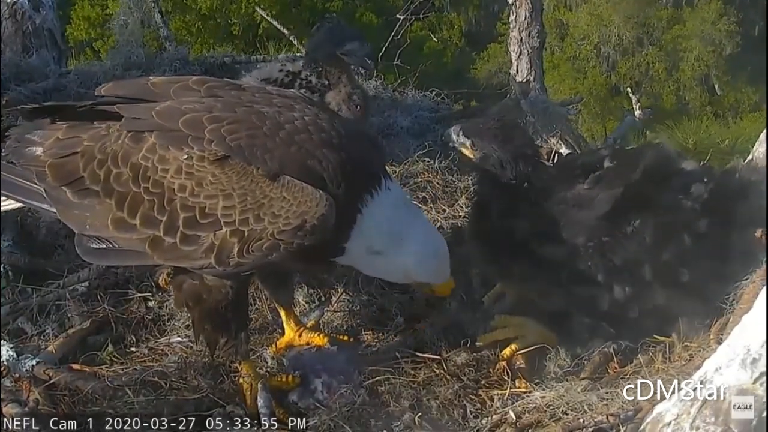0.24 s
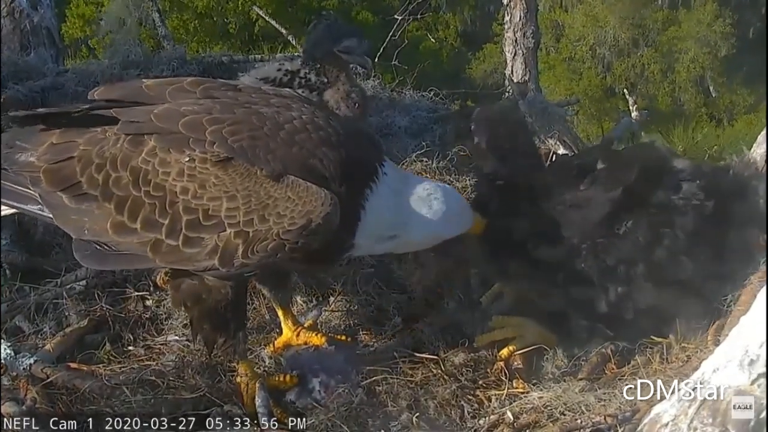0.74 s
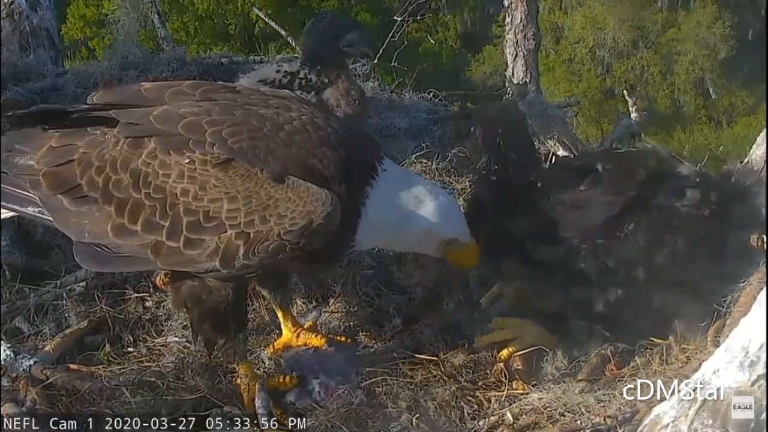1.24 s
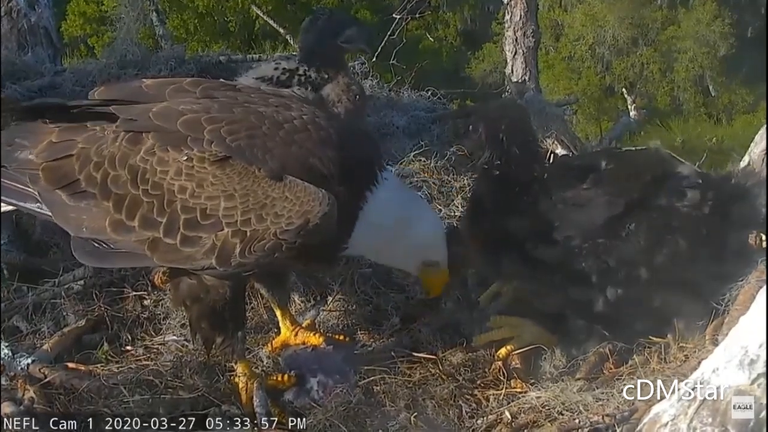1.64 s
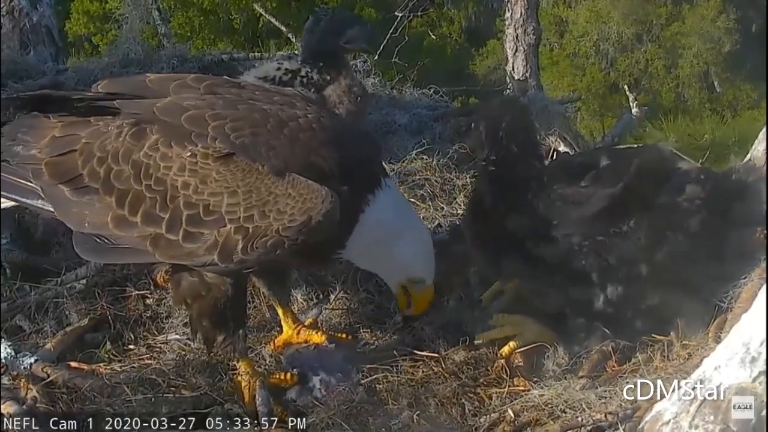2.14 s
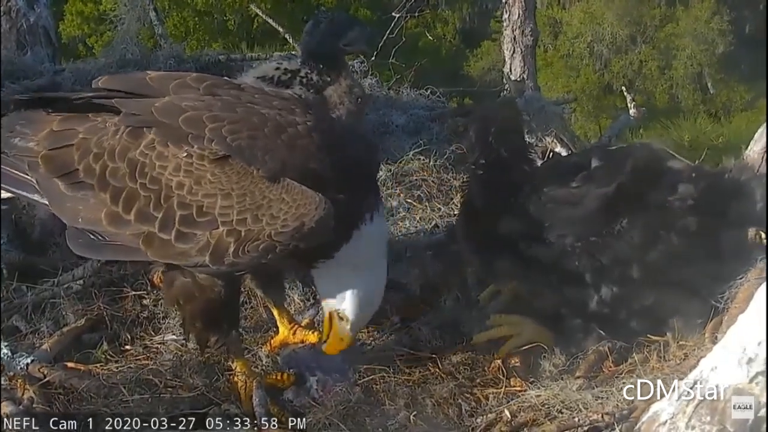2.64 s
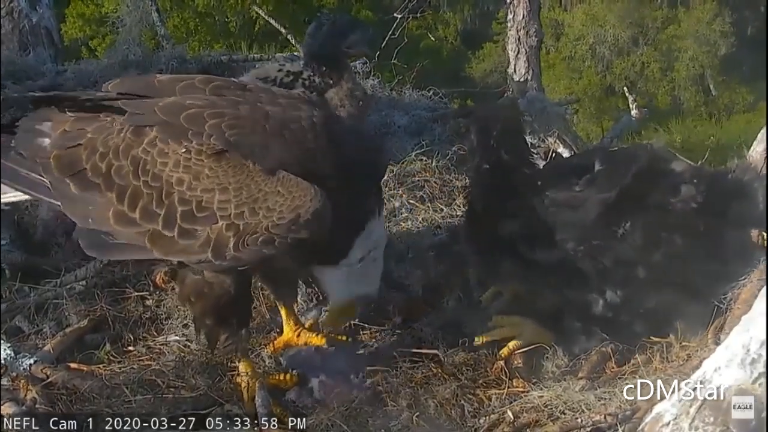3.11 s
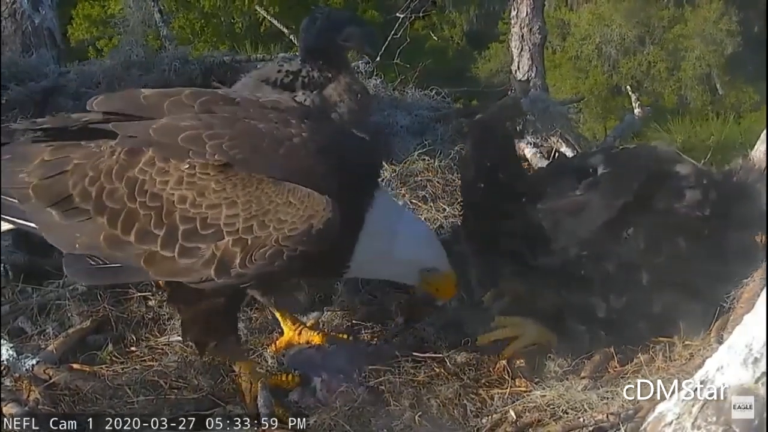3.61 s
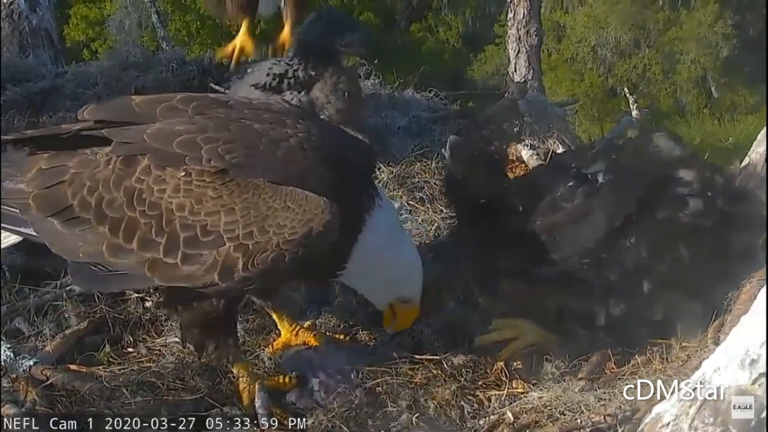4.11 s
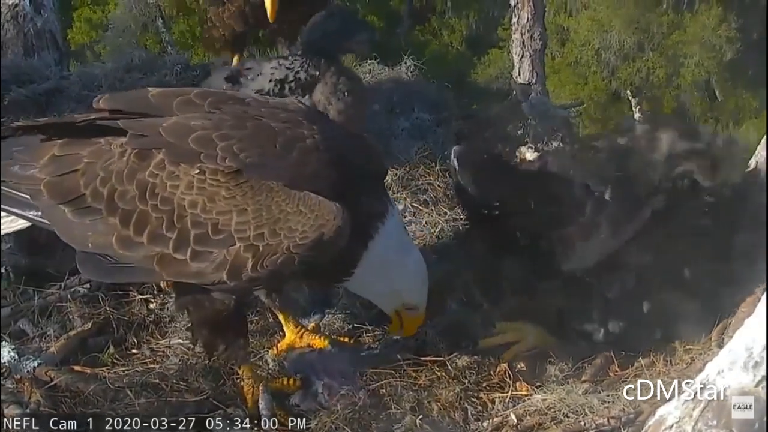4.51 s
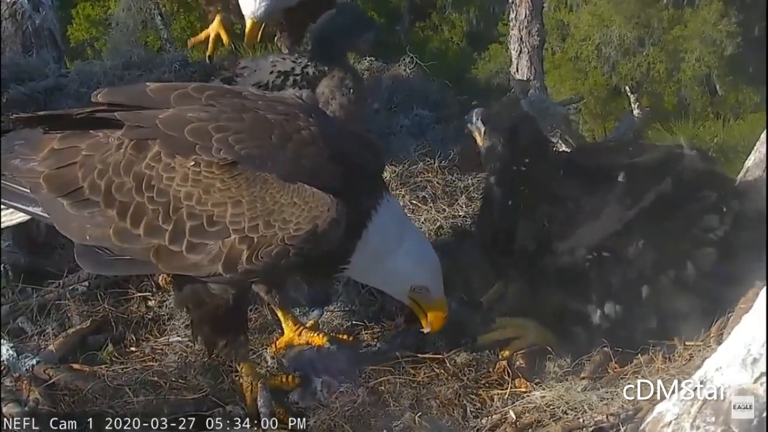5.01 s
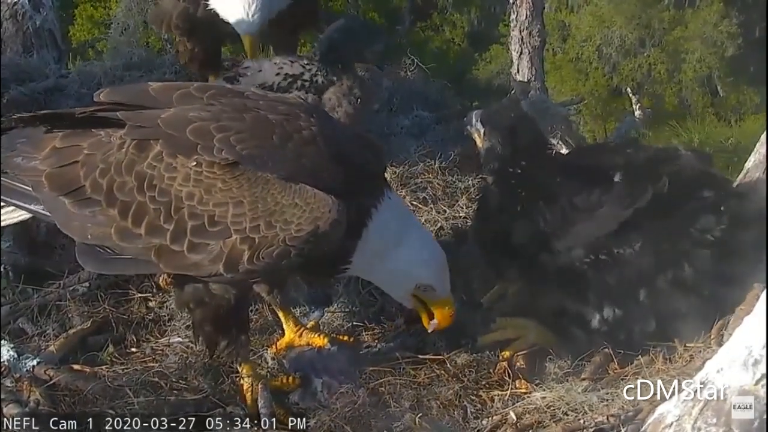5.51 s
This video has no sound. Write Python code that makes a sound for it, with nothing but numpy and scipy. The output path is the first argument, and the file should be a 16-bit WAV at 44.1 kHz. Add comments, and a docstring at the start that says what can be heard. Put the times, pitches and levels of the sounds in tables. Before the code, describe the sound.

Eagles give thin, raspy, wavering high whistles that crack into short yelps, with a warbling scream and chirps over outdoor hiss.

```python
"""At a treetop nest, eagles call close to a small outdoor microphone that overloads on the loudest notes.
Thin, raspy whistles leap, waver and end in a yelp as the voice breaks to a low register; between them come
a warbling scream and a few chirps, and a fainter bird pipes above. The calls are near sines roughened by
a rattle, a buzz and uneven airflow. Trunks and foliage echo them, over noise shaped into a steady hiss,
a low rumble that swells and dips, and soft rustles."""
import sys
import numpy as np
from scipy import signal
from scipy.fft import rfft, irfft
from scipy.io import wavfile
from scipy.ndimage import uniform_filter1d

SR = 44100
rng = np.random.default_rng(int(sys.argv[2]) if len(sys.argv) > 2 else 0)


def pcm_store(signal):
    """Save signal as 16-bit PCM."""
    levels = np.round(np.clip(np.atleast_2d(signal), -1, 1) * 32767)
    wavfile.write(sys.argv[1], SR, levels.astype(np.int16).T)


N = 253553
TIME = np.arange(N) / SR  # seconds

# Long whistles, one list per call; the voice rings clear on the surges and turns hoarse between.
# Each row: time in seconds, pitch in Hz, level in dB before the trim in whistles(), rasp from 0 to 1.
WHISTLE_CALLS = [
    [(0.0, 3150, -16, 0.37), (.022, 3207, -30, 0.4), (.036, 3218, -18.5, 0.17), (.07, 3272, -29.5, 0.67),
     (.082, 3256, -16, 0.36), (.096, 3234, -24, 0.5), (.125, 3270, -19, .15), (.155, 3235, -23.5, 0.53),
     (.18, 3260, -19.5, 0.12), (.198, 3240, -26, 0.76), (.218, 3296, -16.5, 0.25), (.238, 3268, -19, 0.46),
     (.252, 3223, -24.5, 0.68), (.277, 3155, -16, 0.27), (.293, 2790, -19.5, .55)],
    [(.712, 2536, -38.5, 0.38), (.728, 3130, -31, 0.5), (.745, 3430, -28, .65), (.765, 3500, -29, 0.25),
     (.787, 3413, -31.5, 0.48), (.812, 3132, -25.5, 0.18), (.835, 3020, -33, 0.8),
     (.855, 2951, -25.5, 0.35), (.915, 2986, -31, .45), (.952, 3080, -34, .55), (.974, 3097, -22.5, 0.25),
     (.992, 3220, -28.5, 0.61), (1.016, 3280, -18.5, .3), (1.036, 3297, -29, 0.74),
     (1.075, 3350, -29.5, 0.7), (1.15, 3353, -31.5, 0.84), (1.215, 3383, -28, 0.45),
     (1.248, 3443, -22, 0.35), (1.285, 3442, -25, .3), (1.305, 3366, -31.5, .58),
     (1.355, 3435, -22.5, 0.35), (1.395, 3448, -22, .36), (1.415, 3447, -22, 0.43), (1.424, 3451, -23, .35),
     (1.44, 3441, -21.5, 0.3), (1.464, 3428, -29.5, 0.92), (1.491, 3409, -16.5, 0.33)],
    [(2.98, 3530, -40, 0.67), (2.994, 3580, -34.5, 0.68), (3.011, 3540, -40.5, .8),
     (3.023, 3285, -31.5, 0.78), (3.04, 3010, -39, .55), (3.073, 2800, -35.5, 0.37), (3.1, 2847, -52, .6),
     (3.127, 2950, -36, 0.27), (3.143, 2960, -39, .6), (3.165, 3014, -31.5, .15), (3.205, 2940, -41, 0.53),
     (3.222, 2945, -34.5, 0.15), (3.25, 2985, -39, 0.82), (3.287, 2990, -34, 0.81),
     (3.325, 2880, -41, 0.65), (3.333, 2934, -32.5, .2), (3.35, 2980, -34.5, 0.25),
     (3.372, 2958, -30, 0.06), (3.415, 2935, -37.5, .42), (3.44, 2810, -28.5, 0.34),
     (3.452, 2880, -50, 0.6), (3.492, 2880, -29, 0.31), (3.535, 2947, -35.5, 0.36), (3.595, 2832, -38, .5),
     (3.62, 2900, -34, 0.4), (3.645, 2880, -37, 0.56), (3.678, 2890, -33.5, 0.35), (3.72, 2845, -41.5, .58),
     (3.785, 2840, -37.5, 0.83), (3.802, 2850, -37, .35), (3.828, 2794, -31.5, 0.62),
     (3.843, 2820, -57, 0.64), (3.853, 2743, -27, 0.07), (3.872, 2622, -27, 0.2), (3.884, 2538, -45, .4),
     (3.897, 2520, -35, 0.5)],
    [(4.875, 2558, -38.5, 0.41), (4.905, 2768, -37, 0.43), (4.94, 2900, -33, .35), (4.99, 2790, -37, .5),
     (5.068, 2798, -34.5, 0.48), (5.1, 2916, -32, 0.15), (5.176, 2899, -31.5, .2),
     (5.195, 2968, -46.5, 0.68), (5.25, 2975, -38, .7), (5.262, 2894, -30.5, 0.13),
     (5.288, 2899, -29.5, .15), (5.308, 2940, -40, .59), (5.35, 3045, -34.5, 0.27),
     (5.361, 3040, -40, 0.33), (5.372, 3030, -43, 0.5), (5.379, 3020, -30, 0.1), (5.388, 2945, -27, .73),
     (5.395, 2844, -31, 0.69), (5.404, 2715, -46, 0.52), (5.416, 2680, -39, .4)],
]
# One loud, warbling scream that breaks in and out of hoarseness.
# Each row: time in seconds, pitch in Hz, level in dB, rasp from 0 to 1.
SCREAM_CONTOUR = [(1.745, 3350, -40, 0.44), (1.761, 3650, -27.5, 0.6), (1.783, 3650, -24, 0.09),
                  (1.803, 3400, -28.5, 0.85), (1.826, 3150, -23.5, 0.34), (1.851, 3250, -32.5, 0.72),
                  (1.87, 3430, -15.5, 0.38), (1.882, 3535, -29, 0.7), (1.905, 3530, -21.5, 0.19),
                  (1.93, 3494, -24, 0.82), (1.954, 3346, -29, 0.86), (1.978, 3284, -20.5, 0.32),
                  (2.015, 3240, -26.5, 0.53), (2.028, 3393, -17.5, 0.45), (2.043, 3516, -26.5, 0.6),
                  (2.057, 3440, -18.5, 0.54), (2.07, 3270, -23.5, 0.66), (2.086, 3120, -28, 0.6),
                  (2.1, 3170, -17, 0.07), (2.122, 3230, -27, .55), (2.138, 3350, -27.5, 0.54),
                  (2.151, 3370, -24.5, 0.92), (2.165, 3408, -25, 0.4), (2.18, 3290, -23.5, 0.6),
                  (2.225, 3286, -19.5, 0.19), (2.246, 3200, -29, 0.53), (2.269, 3140, -21, 0.27),
                  (2.289, 3120, -22, 0.41), (2.315, 3260, -27.5, 0.48), (2.338, 3350, -24.5, 0.63),
                  (2.37, 3330, -26, 0.63), (2.388, 3380, -22, 0.49), (2.412, 3220, -29.5, .75),
                  (2.431, 3240, -25.5, 0.46), (2.511, 3425, -31, 0.85), (2.53, 3510, -24.5, 0.31),
                  (2.544, 3410, -35, 0.56), (2.567, 3180, -27, 0.77), (2.591, 2552, -34.5, 0.58)]
# Short arched chirps. Each row: time of the top in seconds, half length in seconds, top pitch in Hz,
# full fall in Hz, top level in dB, full fade in dB; the ends reach about 82 % of the fall and the fade.
CHIRP_NOTES = [(4.142, 0.047, 3200, 400.3, -31.5, -10), (4.302, 0.06, 3040, 515.3, -32, -14.5),
               (4.451, .054, 2893, 398.7, -37, -3), (4.57, .045, 2815, 40.1, -41.5, -4.5),
               (4.797, 0.048, 2975, 329.3, -36.5, -1.5)]
# Rasp of a chirp, from 0 to 1: at its crest, then at the full fall.
CHIRP_RASP_RANGE = .35, .7
# The voice breaks. Each row: start in seconds, length in seconds, start and end pitch in Hz, level in dB,
# fundamental and third harmonic in dB against the second harmonic.
YELP_NOTES = [(0.302, 0.012, 2060, 1956, -33.5, 4, -31.5), (.31, 0.016, 1314, 1237, -15.5, -24, -16.5),
              (0.328, 0.0082, 1247, 1204, -17, -29, -13), (1.491, 0.0048, 1570, 1305, -16.5, -45, -23.5),
              (1.505, 0.025, 2013, 1812, -28, -4.5, -22.5), (1.52, .024, 1190, 1131, -32.5, -14, 7.5),
              (3.908, 0.0088, 1144, 1126, -34.5, -16.5, -3), (5.415, .016, 1320, 1248, -28.5, -32, -24),
              (5.429, 0.018, 1194, 1168, -32.5, -31, -7)]
# Sharp cracks as two whistles break off. Each row: start in seconds, decay time in seconds, level in dB.
CRACK_BURSTS = [(0.309, 0.012, -47.5), (1.492, .005, -43.5)]
# How the membrane shakes as the calls go on.
# Each row: time in seconds, rattles per second, rattle depth and buzz depth as ratios.
MEMBRANE_SHAKING = [(.1, 206, 0.64, 0.43), (.29, 210, 0.28, 0.62), (.72, 123, 1, 0.15),
                    (.85, 160, 0.76, 0.2), (1.03, 190, 0.58, .25), (1.2, 335, 0.75, 0.26),
                    (1.48, 334, 0.86, .35), (1.78, 210, .7, 0.57), (2.0, 234, 0.59, 0.47),
                    (2.2, 278, 0.53, 0.74), (2.37, 338, 0.57, 0.69), (2.579, 250, 0.55, 0.55),
                    (2.99, 230, 0.9, 0.22), (3.28, 150, .95, .25), (3.45, 225, 0.64, .35),
                    (4.3, 177, .75, 0.25), (5.4, 210, 0.79, 0.27)]
# Overtones of the voice. Each row: multiple of the pitch, level in dB against the note.
VOICE_OVERTONES = [(2, -43), (3, -53), (4, -61.5)]
# The fainter bird's arched notes. Each row: time of the top in seconds, half length in seconds,
# top pitch in Hz, fall to either end in Hz, top level in dB before the trim in piping(),
# change of level at the ends in dB.
PIPED_NOTES = [(2.66, 0.036, 3830, 90.4, -37.5, -1), (2.74, 0.047, 3870, 90.16, -44, -5),
               (2.83, .04, 3800, 70.65, -47.5, -6), (3.385, 0.054, 3945, 147.8, -45, 5.5),
               (3.53, 0.077, 3887, 100.7, -45.5, 2), (3.675, 0.072, 3945, 132.9, -46.5, -6),
               (4.312, 0.0403, 4027, 98.8, -46, -7), (4.46, 0.037, 4020, 60.9, -47.5, -3),
               (4.565, .05, 3950, 30.03, -51.5, 6), (5.618, 0.052, 4124, 108.7, -43.5, -22)]
# Echoes off nearby limbs and trunks. Each row: delay in seconds, level in dB.
TRUNK_ECHOES = [(.0062, -15), (.0123, -12), (.0195, -15), (.034, -17), (.057, -21)]
# Short rustles, and two broad, faint swells of low noise under the loud calls.
# Each row: centre in seconds, spread in seconds, level in dB.
RUSTLE_SWELLS = [(0.274, 0.083, -49.5), (0.997, 0.5, -56), (2.106, 0.43, -58.5), (3.5, 0.062, -52.5),
                 (4.82, 0.012, -52.5), (4.955, 0.025, -51), (5.013, 0.05, -59), (5.035, 0.015, -51),
                 (5.056, 0.0082, -48.5)]
# Swells and dips of the low rumble, several of them under the loudest calls.
# Each row: centre in seconds, spread in seconds, change of level in dB.
RUMBLE_SWELLS = [(0.277, 0.059, 10.5), (1.04, 0.068, 2.5), (1.355, 0.048, 9), (1.676, 0.088, -10.5),
                 (1.863, 0.062, 11), (2.023, 0.078, 7), (2.66, 0.044, -19.5), (2.858, 0.094, -12),
                 (3.485, 0.071, 11), (3.687, 0.04, -4), (4.811, 0.019, 7), (5.027, 0.045, 17),
                 (5.42, 0.061, 8)]
# Noise spectra. Each row: frequency in Hz, relative density in dB per Hz.
OVERLOAD_SPECTRUM = [(4000, -27.5), (6000, -1), (8000, 3), (10000, -2.5), (11500, -8.5), (13500, -0.5)]
CRACK_SPECTRUM = [(500, -8.5), (1500, -5), (4000, 2.5), (6000, -5), (8000, 5.5), (10000, -15.5),
                  (14000, -8.5)]
RUSTLE_SPECTRUM = [(40, -8), (130, -12.5), (300, -1), (700, -1.5), (1300, -1), (3000, -6), (8000, -52.5)]
RUMBLE_SPECTRUM = [(20, -7.5), (45, 0.5), (78, -0.5), (120, -5), (200, -13), (400, -24), (1000, -31),
                   (3000, -72.5)]
HISS_SPECTRUM = [(180, -68), (300, -41.5), (325, -26), (382, -25.5), (589, -19.5), (881, -18.5),
                 (1180, -12.5), (1680, -14.5), (2630, 1.5), (3690, -3.5), (3990, -6), (5690, -26.5),
                 (14000, -49.5)]


def whistles(trim_db=-1.5):
    """Long held calls that leap up, sag, waver and drop."""
    s, _, _, rasp = np.vstack(WHISTLE_CALLS).T
    notes = [np.array(rows)[:, :3] for rows in WHISTLE_CALLS]
    return undb(trim_db) * voice(notes, np.interp(TIME, s, rasp))


def scream():
    """A loud call swings up and down in pitch, clear on its surges and harsh between, then sinks away."""
    s, hz, db, rasp = np.transpose(SCREAM_CONTOUR)
    return voice([np.column_stack([s, hz, db])], np.interp(TIME, s, rasp))


def chirps(bell=1.7):
    """A few short notes between the last two whistles: clear at the crest, hoarse as they rise and trail off."""
    u = np.linspace(-1, 1, num=21)
    flank = 1 - np.exp(-bell * u ** 2)  # 0 at the crest
    notes = []
    for s, half, hz, fall, db, fade in CHIRP_NOTES:
        notes.append(np.column_stack([s + half * u, hz - fall * flank, db + fade * flank]))
    rasp = np.tile(np.interp(flank, [0, 1], CHIRP_RASP_RANGE), len(notes))
    return voice(notes, np.interp(TIME, np.vstack(notes)[:, 0], rasp))


def voice(notes, rasp, tremble_db=2.06, surge_db=-20, crackle_db=-59):
    """Trembling syrinx notes; the strongest surges crackle with treble noise as the microphone overloads."""
    hz, loud = phrase(notes, edge_s=.004)
    tone = syrinx(hz, rasp) * loud * undb(tremble_db * flutter(64))
    power = uniform_filter1d(tone ** 2, size=40)
    surge = np.tanh((power / undb(surge_db) ** 2) ** 2)
    return tone + undb(crackle_db) * surge * coloured(OVERLOAD_SPECTRUM)


def syrinx(hz, rasp, buzz_hz=463.6):
    """A near sine; with rasp the clear tone gives way to side bands from uneven airflow, a rattle and a buzz."""
    rasp = np.clip(rasp, 0, .95)
    s, *columns = np.transpose(MEMBRANE_SHAKING)
    rattle_hz, rattle_depth, buzz_depth = (np.interp(TIME, s, column) for column in columns)
    phase = turn(hz * (1 + rasp * .013 * flutter(110)))
    # uneven airflow, in a slow and a fast layer
    slow_air = flutter(170) + 1j * flutter(170)
    fast_air = flutter(560, order=5) + 1j * flutter(560, order=5)
    turbulence = .42 * (slow_air + fast_air)
    # the rattle puts one side band below the note; the hoarser, the less even
    rattle_phase = turn(rattle_hz * (1 + rasp ** 2 / 3 * flutter(60)))
    rattle = rattle_depth * np.exp(-1j * rattle_phase) * (1 + .3 * flutter(25))
    # the buzz puts one to either side
    buzz = buzz_depth * np.cos(turn(buzz_hz * (1 + .21 * rasp * flutter(70))))
    swing = np.sqrt(1 - rasp ** 2) + rasp * (np.sqrt(rasp) * turbulence + rattle + buzz)
    # the membrane resists the widest swings
    held = swing / (1 + np.abs(swing / 1.7) ** 4) ** .25
    wave = held * np.exp(1j * phase)
    # overtones are powers of the wave, so they flare at every surge of the vibration
    overtones = sum(undb(db) * wave ** (k + 2) for k, (_, db) in enumerate(VOICE_OVERTONES))
    return np.sqrt(2) * np.imag(wave + overtones)


def yelps(rise_s=0.002, fall_s=0.0026):
    """The voice drops to a low, rough register, each note a wobbling, grainy stack of three harmonics."""
    out = np.zeros(N)
    wobble = 1 + .013 * flutter(300)
    grain = 1 + .28 * flutter(400)
    for start, length, from_hz, to_hz, db, first_db, third_db in YELP_NOTES:
        end = start + length
        phase = turn(np.interp(TIME, [start, end], [from_hz, to_hz]) * wobble)
        gains = undb([first_db, 0, third_db])
        tone = sum(g * np.sin((k + 1) * phase) for k, g in enumerate(gains))
        out += undb(db) * unit(tone) * grain * gate(start, end, rise_s, fall_s)
    return out


def cracks():
    """A burst of broad noise where the voice snaps into its low register."""
    burst = sum(undb(db) * (TIME > s) * np.exp(-np.abs(TIME - s) / decay) for s, decay, db in CRACK_BURSTS)
    return burst * coloured(CRACK_SPECTRUM)


def piping(trim_db=-1, tremble_db=3.0):
    """A second bird's faint, high whistle: a sine slightly unsteady in pitch and loudness."""
    hz, loud = phrase(arches(PIPED_NOTES), edge_s=0.0031)
    phase = turn(hz * (1 + .003 * flutter(90)))
    return np.sqrt(2) * np.sin(phase) * loud * undb(trim_db + tremble_db * flutter(40))


def woods(x, leaves_db=-13, t60_s=0.71, build_s=0.26, grove_db=-22.5, grove_s=0.17, spread_s=0.017):
    """Single echoes from limbs and trunks, a blurred one from the next trees, a diffuse tail from the foliage."""
    t = TIME[:SR]
    # the tail builds up while it decays
    tail = rng.standard_normal(SR) * undb(-60 * t / t60_s) * (1 - np.exp(-t / build_s))
    grove = rng.standard_normal(SR) * np.exp(-((t - grove_s) / spread_s) ** 2)
    echo = undb(leaves_db) * tail / np.linalg.norm(tail)
    echo += undb(grove_db) * grove / np.linalg.norm(grove)
    for delay, db in TRUNK_ECHOES:
        echo[int(delay * SR)] += undb(db)
    return x + signal.fftconvolve(x, echo)[:N]


def rustles(grain_db=3):
    """Short rustles, and two broad, faint swells of low noise under the loud calls: grainy, shaped noise."""
    swell = sum(undb(db) * np.exp(-((TIME - s) / spread) ** 2 / 2) for s, spread, db in RUSTLE_SWELLS)
    return swell * unit(coloured(RUSTLE_SPECTRUM) * undb(grain_db * flutter(42)))


def rumble(base_db=-56, waver_db=3.0):
    """Swells and dips of a low, wavering noise rumble, several of them under the loudest calls."""
    swell_db = sum(db * np.exp(-((TIME - s) / spread) ** 2 / 2) for s, spread, db in RUMBLE_SWELLS)
    return coloured(RUMBLE_SPECTRUM) * undb(base_db + swell_db + waver_db * flutter(5.3))


def hiss(level_db=-42.5):
    """Steady outdoor hiss, strongest where the microphone is most sensitive."""
    return coloured(HISS_SPECTRUM) * undb(level_db)


def arches(table):
    """Rows (s, Hz, dB) of notes that bend in pitch and level along a parabola."""
    u = np.linspace(-1, 1, num=15)
    notes = []
    for s, half, hz, fall, db, fade in table:
        notes.append(np.column_stack([s + half * u, hz - fall * u ** 2, db + fade * u ** 2]))
    return notes


def phrase(notes, edge_s):
    """Pitch and loudness of a series of notes with rows (s, Hz, dB), silent between them."""
    rows = np.vstack(notes)
    s, hz, db = rows[np.argsort(rows[:, 0], kind="stable")].T
    sounding = sum(gate(note[0][0], note[-1][0], edge_s, edge_s) for note in notes)
    glide = uniform_filter1d(np.interp(TIME, s, hz), size=400)
    effort_db = uniform_filter1d(np.interp(TIME, s, db), size=200)
    return glide, sounding * undb(effort_db)


def gate(start, end, rise_s, fall_s):
    """Soft-edged window between two times."""
    return (1 + np.tanh((TIME - start) / rise_s)) * (1 + np.tanh((end - TIME) / fall_s)) / 4


def turn(hz):
    """Phase of a vibration with a moving pitch."""
    return 2 * np.pi * np.cumsum(hz) / SR


def flutter(hz, order=2):
    """Random motion of rms 1: noise low-passed at hz."""
    lowpass = signal.butter(order, min(hz, SR / 4), fs=SR, output="sos")
    return unit(signal.sosfilt(lowpass, rng.standard_normal(N)))


def coloured(points):
    """Noise of rms 1 with the given spectrum."""
    hz, db = np.transpose(points)
    bins = np.arange(N // 2 + 1) * SR / N
    gain = undb(np.interp(np.log(bins + 1), np.log(hz), db))
    return unit(irfft(rfft(rng.standard_normal(N)) * gain, N))


def unit(x):
    """Scale to rms 1."""
    return x / np.sqrt(np.mean(x ** 2))


def undb(db):
    """Decibels to gain."""
    return 10 ** (np.asarray(db) / 20)


def scene():
    """The birds among the trees, over rustles, rumble and hiss."""
    birds = whistles() + scream() + chirps() + yelps() + cracks() + piping()
    return (woods(birds) + rustles() + rumble() + hiss())[None]


def record(dry, ceiling=0.2, knee=8.5, lopsided=0.1, top_hz=14100):
    """The microphone flattens the loudest peaks, the negative side a little sooner; the top is cut."""
    limit = ceiling * (1 + lopsided * np.sign(dry))
    flattened = dry / (1 + np.abs(dry / limit) ** knee) ** (1 / knee)
    return signal.sosfiltfilt(signal.ellip(10, .1, 60, top_hz, fs=SR, output="sos"), flattened)


dry = scene()
out = record(dry)
pcm_store(out)
```